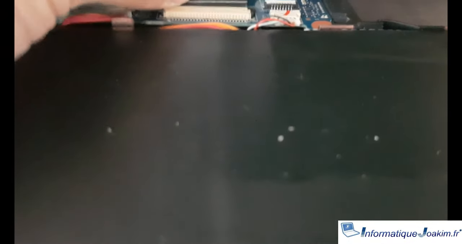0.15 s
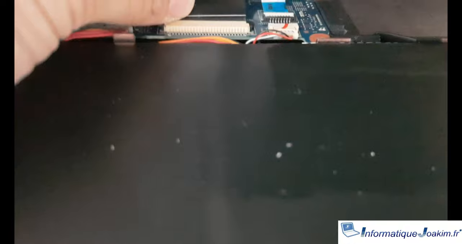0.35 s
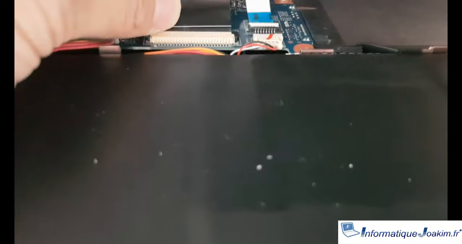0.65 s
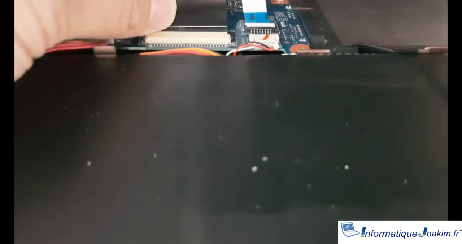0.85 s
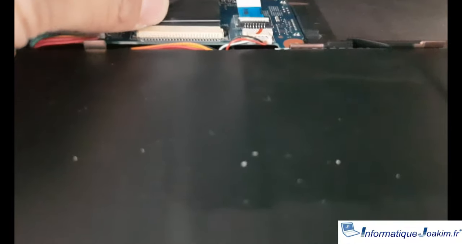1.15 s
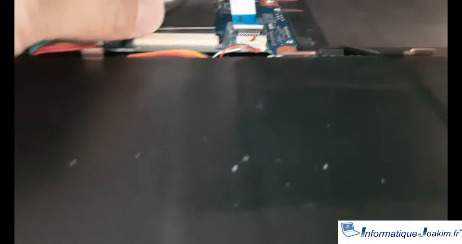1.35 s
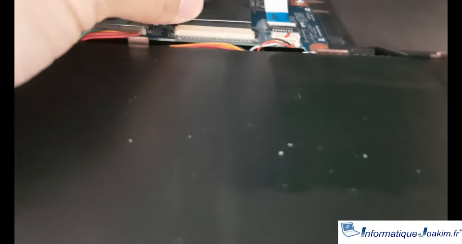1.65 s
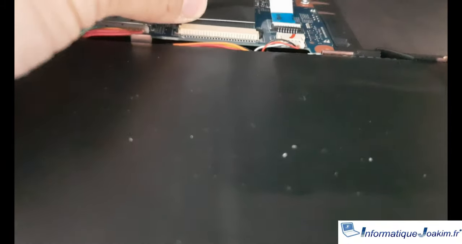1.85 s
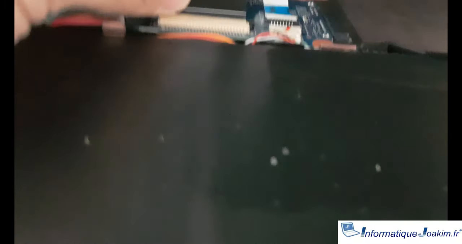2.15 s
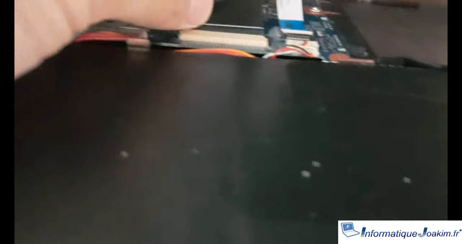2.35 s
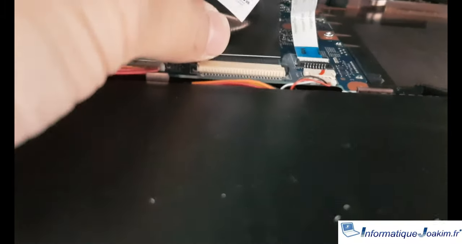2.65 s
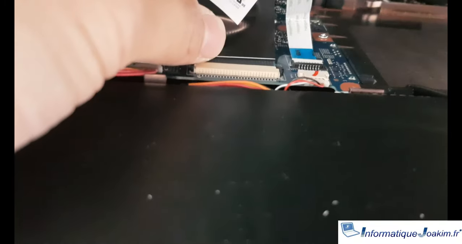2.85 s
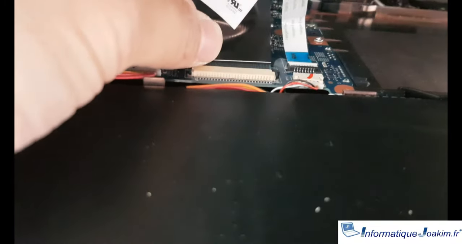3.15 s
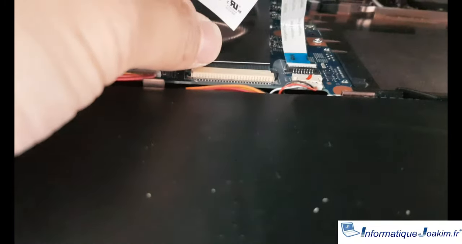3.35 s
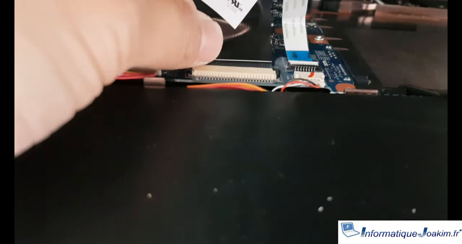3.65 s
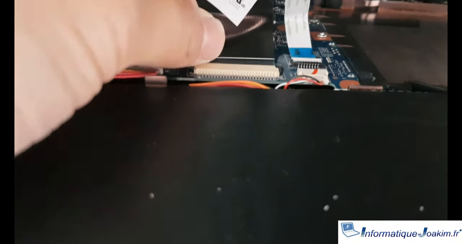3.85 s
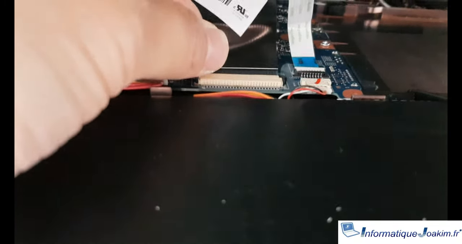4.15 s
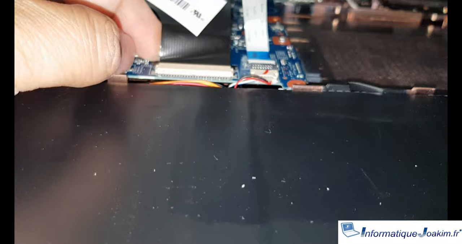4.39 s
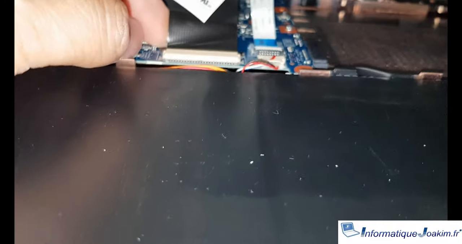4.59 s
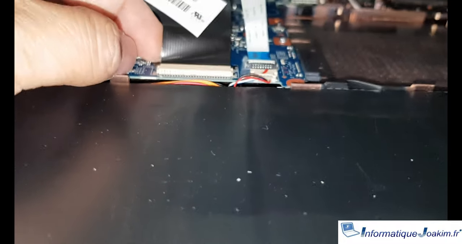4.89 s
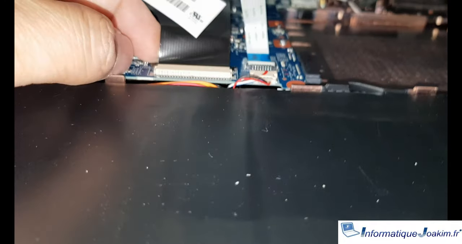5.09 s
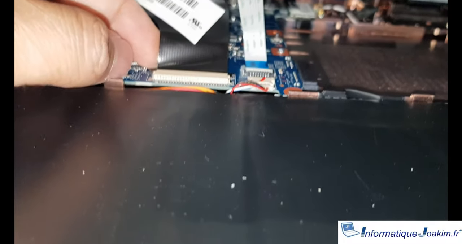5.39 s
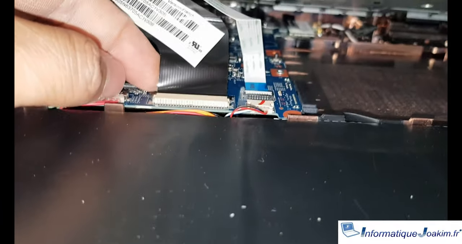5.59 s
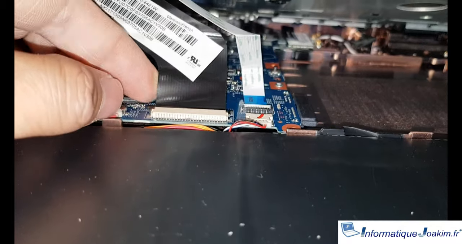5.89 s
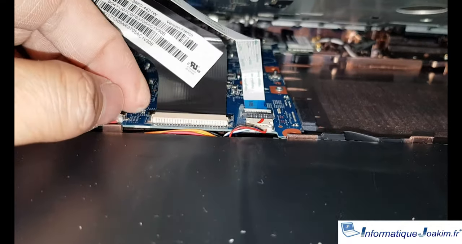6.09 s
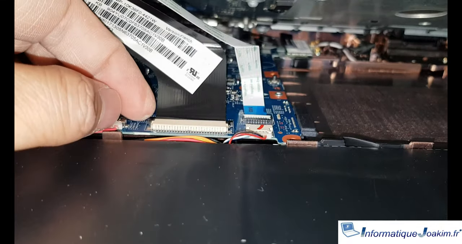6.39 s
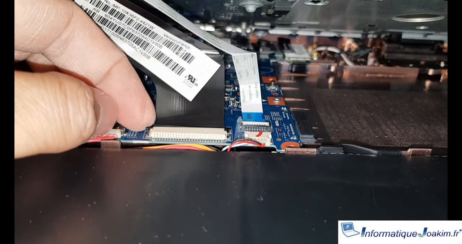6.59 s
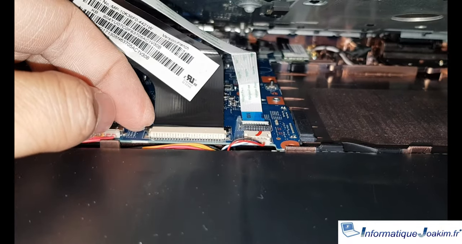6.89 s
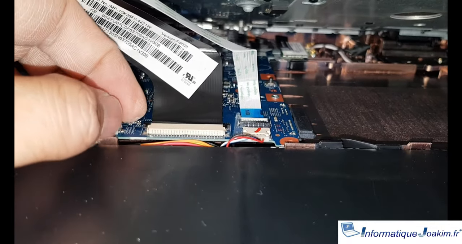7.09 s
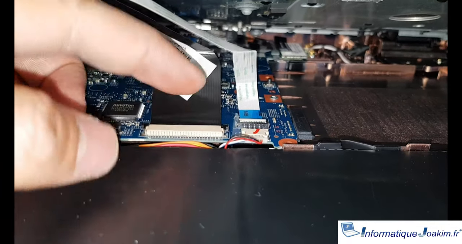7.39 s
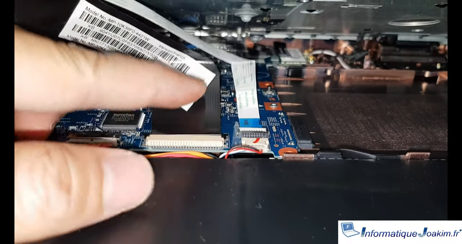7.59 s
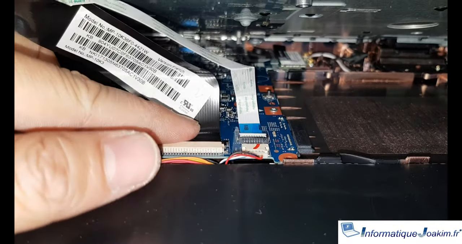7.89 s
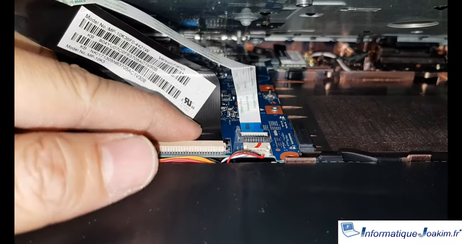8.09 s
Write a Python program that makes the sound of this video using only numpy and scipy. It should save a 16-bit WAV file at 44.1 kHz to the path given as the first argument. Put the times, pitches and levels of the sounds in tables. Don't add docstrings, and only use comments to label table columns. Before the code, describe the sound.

Soft film crackles and skin rustles, then heavy muffled bumps and hard clicks against a held microphone, quiet ventilation humming behind.

```python
import sys
import numpy as np
from scipy import signal
from scipy.fft import rfft, irfft
from scipy.io import wavfile

SR = 44100
rng = np.random.default_rng(int(sys.argv[2]) if len(sys.argv) > 2 else 0)


def gain_from_decibels(decibels):
    exponent = np.asarray(decibels, float) / 20
    return 10 ** exponent


def waveform_to_disk(signal):
    frames = np.transpose(np.atleast_2d(signal))
    scaled = np.clip(frames, -1, 1) * 32767
    samples = np.round(scaled).astype(np.int16)
    wavfile.write(sys.argv[1], SR, samples)


N = 363384
SILENCE_START_S, SILENCE_END_S = 4.326, 4.384


def noise(*channels):
    return rng.standard_normal((*channels, N))


def rms_one(x):
    return x / np.sqrt(np.mean(x ** 2) + 1e-20)


def in_time(curve, outside=None):
    s, db = np.transpose(curve)
    return np.interp(np.arange(N) / SR, s, db, outside, outside)


def at_hz(points, hz):
    point_hz, value = np.transpose(points)
    return np.interp(np.log(hz), np.log(point_hz), value)


def bins():
    return np.maximum(np.arange(N // 2 + 1) * SR / N, 1)


def peak(hz, width_hz):
    return 1 / (1 + (2 * (bins() - hz) / width_hz) ** 2)


def shaped(x, gain):
    return rms_one(irfft(rfft(x) * gain, N))


def closed(points):
    below = (points[0][0] / 2, -60)
    above = (points[-1][0] * 1.06, -70)
    return gain_from_decibels(at_hz([below] + list(points) + [above], bins()))


def panned(x, pan_db):
    centre_db = 20 * np.log10(np.cosh(pan_db * np.log(10) / 40))
    gains = gain_from_decibels(np.array([pan_db / 2, -pan_db / 2]) - centre_db)
    return x * gains[:, None]


def side(curve, s):
    return np.interp(s, *np.transpose(curve))


def add(out, s, burst):
    i = int(s * SR)
    out[:, i:i + burst.shape[1]] += burst[:, :N - i]


# (time [s], level [dB])
HUM_LEVEL = [(0.0, -47.5), (4.45, -48), (4.86, -43), (5.03, -49), (6.22, -50.5), (8.24, -48)]
# (frequency [Hz], density [dB per Hz])
HUM_SPECTRUM = [(18, -58), (30, -18), (58, -34.5), (91, -5), (131, -5), (156, -7), (202, -3.5), (239, -4),
                (309, -1), (344, -10.5), (426, -7), (601, -14.5), (922, -15), (2260, -27), (5000, -75.5),
                (6500, -99), (11000, -120)]
# (frequency [Hz], width [Hz], level over the hum [dB])
ROOM_MODES = [(101.3, 2.5, 8), (126.8, 19.4, 7), (213, 4.8, 10.5), (308, 4.2, 6), (303, 4, 3.5),
              (432.2, 1.6, 6.5), (495, 6.1, 4.5), (802, 17, 6.5), (912.6, 21, 7.5), (1065, 46, 0),
              (1468, 3.1, 14)]
# (frequency [Hz], correlation [-1 to 1])
LIKENESS = [(60, 0.75), (150, 0.98), (380, 0.84), (950, 0.14), (2380, -0.29), (5980, -0.021),
            (15000, -0.01)]


def hum():
    lift = 1 + sum(peak(hz, width) * gain_from_decibels(2 * db) for hz, width, db in ROOM_MODES)
    alike = np.clip(at_hz(LIKENESS, bins()), -.95, .95)
    mid, side_part = rfft(noise(2)) * closed(HUM_SPECTRUM) * np.sqrt(lift)
    ports = np.sqrt(1 + alike) * mid + np.sqrt(1 - alike) * side_part * [[1], [-1]]
    return gain_from_decibels(in_time(HUM_LEVEL) + 3.0) * rms_one(irfft(ports, N))


# (frequency [Hz], density [dB per Hz])
SELF_NOISE = [(1500, -12), (3000, -5), (5500, -6.5), (7300, -13), (9000, -11), (11000, -4.5), (13000, 0),
              (15500, -2.5)]


def self_noise():
    return gain_from_decibels(-77) * shaped(noise(2), closed(SELF_NOISE))


# (frequency [Hz], width [Hz], level before the silence [dB rms], level after it [dB rms])
RIGHT_BANDS = [(2100, 1050, -73, -60), (3010, 550, -75.5, -104), (4300, 2000, -77, -100.5),
               (5560, 960, -89.5, -78.5), (6390, 720, -83.5, -85)]
# (time [s], level [dB])
RIGHT_SHADE = [(0, 6.5), (.8, 0), (1.8, 4.5), (2.05, 6), (2.5, 6), (4.33, -4)]


def right_port_bands():
    out = np.zeros(N)
    before = np.arange(N) / SR < SILENCE_START_S
    shade_db = in_time(RIGHT_SHADE)
    for hz, width, before_db, after_db in RIGHT_BANDS:
        db = np.where(before, before_db + shade_db, after_db)
        wander_db = 2.2 * shaped(noise(), peak(0, 6.6))
        out += gain_from_decibels(db + wander_db) * shaped(noise(), peak(hz, width))
    return out


# (time [s], level [dB])
FINGERTIP = [(4.38, -56.5), (4.555, -56.5), (4.559, -82), (4.572, -79), (4.575, -37), (4.7, -57),
             (5.05, -51.5), (5.4, -51), (6.0, -50.5), (6.635, -50), (6.645, -100)]
# (frequency [Hz], density [dB per Hz])
FINGERTIP_COLOUR = [(700, 4.5), (1800, -2), (2300, 0), (3000, 8), (3800, 0.5), (5700, 1.5), (6600, -3.5),
                    (8000, -10.5), (9100, -7.5), (10000, -11), (10850, -9), (11500, -9), (11800, -25),
                    (13000, -28), (15000, -40)]


def fingertip():
    return gain_from_decibels(in_time(FINGERTIP, -150)) * shaped(noise(), closed(FINGERTIP_COLOUR))


# (time [s], level [dB rms])
LEFT_LINE = [(4.385, -77), (5.2, -129), (6.4, -100), (6.7, -100)]


def left_line():
    return gain_from_decibels(in_time(LEFT_LINE, -150)) * shaped(noise(), peak(10680, 350))


def whistle():
    t = np.arange(N) / SR
    sounding = (t > 2.12) & (t < 2.62)
    return gain_from_decibels(-83) * np.sin(2 * np.pi * 14406 * t) * sounding


def capsules():
    left = left_line()
    right = right_port_bands() + fingertip() + whistle()
    return self_noise() + np.array([left, right])


# (time [s], level [dB])
SWAY = [(0.0, -65.5), (3.19, -55), (3.35, -73), (4.18, -66), (4.8, -47), (5.21, -69), (5.51, -55),
        (6.72, -65), (7.16, -54), (8.24, -70.5)]


def sway():
    shared, left, right = noise(3)
    ports = np.array([1.7 * shared + left, 1.6 * shared + right])
    rumble = shaped(ports, peak(69, 67) * np.minimum(bins() / 40, 1) ** 2)
    return gain_from_decibels(in_time(SWAY) + 6.0) * rumble


# (time [s], pan [dB])
GRIP_SIDE = [(1.0, 4.5), (2.1, 2), (2.5, 7), (3.3, 1.5), (4.4, -3.5), (4.81, 0.5), (4.88, -13.5),
             (5.04, -11), (5.3, -43), (5.5, -24), (7.0, -10), (7.36, -4)]
# (time [s], peak level [dB], frequency [Hz])
LURCHES = [(1, -43, 71.6), (1.248, -34, 74.5), (1.33, -36, 74), (1.607, -40, 90), (2.05, -34.5, 63),
           (2.399, -55, 92), (2.661, -47, 94), (2.83, -39, 91.5), (3.242, -32, 92.5), (4.405, -42, 65),
           (4.573, -33, 56), (4.59, -42, 108), (4.8, -59, 92), (5.041, -33, 78.6), (5.297, -36.5, 81.6),
           (5.498, -60, 86.1), (7.099, -63, 95), (7.299, -59, 84)]


def lurches(rise_s):
    out, t = np.zeros((2, N)), np.arange(SR // 6) / SR
    port_lag = np.array([[0], [.8]])
    for s, db, hz in LURCHES:
        swell = t / rise_s * np.exp(1 - t / rise_s)
        wave = np.sin(2 * np.pi * hz * t - port_lag) * swell
        add(out, s, gain_from_decibels(db) * panned(wave, side(GRIP_SIDE, s)))
    return out


def gliding_cycles(t, hz, glide, glide_s):
    return hz * (t + glide * glide_s * (1 - np.exp(-t / glide_s)))


# (time [s], peak level [dB], final frequency [Hz], decay [s])
KNOCKS = [(2.2, -31.5, 477, .006), (2.2914, -35, 382, 0.009), (2.4122, -39, 450, 0.00067),
          (2.4698, -26, 477, 0.005), (2.531, -26, 400, 0.0052), (2.5987, -25, 377, 0.0028),
          (2.8051, -26.5, 386, 0.0059), (4.4738, -32, 443, 0.0049), (4.494, -30.5, 436, 0.0049),
          (4.5163, -33.5, 433, 0.013), (4.544, -27.5, 440, 0.0081)]


def knocks(glide, glide_s, right_db):
    out, t = np.zeros((2, N)), np.arange(SR // 30) / SR
    port_gain = gain_from_decibels(np.array([[0], [right_db]]))
    for s, db, hz, decay_s in KNOCKS:
        cycles = gliding_cycles(t, hz, glide, glide_s)
        envelope = np.exp(-(t / decay_s) ** 2) * (1 - np.exp(-t / 0.00034))
        add(out, s, gain_from_decibels(db + 4.5) * np.sin(2 * np.pi * cycles) * envelope * port_gain)
    return out


# (time [s], peak level [dB], frequency [Hz], ring T60 [s], left shell ring against the peak [dB])
THUMPS = [(1.248, -37, 209, 0.012, -9), (1.308, -40, 135, 0.1, -20), (1.619, -41, 113, 0.035, -24),
          (2.082, -43.5, 146, 0.069, -20), (2.4107, -27.5, 133, 0.022, -23),
          (2.5435, -30.5, 109, 0.031, -28), (2.6754, -14.5, 135, 0.017, -12.5),
          (2.833, -15.5, 159, 0.015, -12), (2.9318, -22, 176, 0.018, -8.5), (3.0197, -21, 168, 0.018, -7),
          (3.1082, -19.5, 173, 0.017, -5), (3.1632, -17.5, 148, 0.011, -8.5),
          (3.2365, -20.5, 133, 0.013, -10), (4.575, -21.5, 163, 0.019, -7),
          (4.6867, -27.5, 200, 0.01, -8.5), (4.702, -30.5, 219, 0.017, -9), (4.7193, -25, 240, 0.014, -11),
          (5.735, -24.5, 266, .015, -30), (4.7447, -9.5, 149, 0.032, -3), (4.8045, -8.5, 153, 0.028, -6),
          (4.8787, -10, 150.5, 0.029, 2.5), (4.8943, -30, 170, .02, -15), (4.921, -29, 160, 0.024, -6),
          (4.9633, -24, 199, 0.013, -10), (4.979, -23, 240, 0.015, -8), (4.994, -10.5, 150, 0.024, -1),
          (5.04, -35, 126, 0.044, 1), (5.296, -22.5, 132, 0.0082, -30), (5.513, -15, 196, 0.0097, -30),
          (6.992, -35.5, 207, 0.024, -20), (7.017, -39.5, 208, 0.035, -20), (7.12, -33.5, 213, 0.02, -20),
          (7.168, -35, 194, 0.031, -20), (7.22, -28.5, 181, 0.019, -27), (7.282, -31, 175, 0.019, -20),
          (7.36, -27.5, 131, 0.017, -17)]
FRAME_HZ, FRAME_S, FRAME_DB = 358, 0.0063, -13
SHELL_HZ, SHELL_S = 670, .003
PRESS_S = .0014
LEFT_LATE_S = 0.0008


def thumps(glide, glide_s, puff_db, puff_s):
    out, t = np.zeros((2, N)), np.arange(SR // 12) / SR
    far_filter = signal.butter(1, 330, fs=SR)
    skin_filter = signal.butter(1, [700, 7000], "band", fs=SR)
    puff_fade = np.exp(-(t / puff_s) ** 3)
    frame_swell = t / FRAME_S * np.exp(1 - t / FRAME_S) * np.exp(-t / 0.005)
    frame = gain_from_decibels(FRAME_DB) * np.cos(2 * np.pi * FRAME_HZ * t) * frame_swell
    shell = np.sin(2 * np.pi * SHELL_HZ * t) * np.exp(-t / SHELL_S) * (1 - np.exp(-4 * t / PRESS_S))
    for s, db, hz, t60, shell_db in THUMPS:
        cycles = gliding_cycles(t, hz, glide, glide_s)
        damping = gain_from_decibels(-60 * (t / max(t60, .01)) ** 1.5)
        near = -np.sin(2 * np.pi * cycles) * damping * (1 - np.exp(-t / PRESS_S)) + frame
        far = 0.8 * signal.lfilter(*far_filter, near)
        wave = np.array([near - gain_from_decibels(shell_db) * shell, far])
        if s > SILENCE_END_S:
            wave[0] = np.interp(t - LEFT_LATE_S, t, wave[0], 0)
        puff = signal.lfilter(*skin_filter, rng.standard_normal((2, len(t)))) * puff_fade * gain_from_decibels(puff_db)
        add(out, s + .0008, gain_from_decibels(db + 8.0) * panned(wave + puff, side(GRIP_SIDE, s)))
    return out


def contacts(table, ring_cycles, rise_s, snap_s, rough, tail_db, spike, top_pan_db):
    out, t = np.zeros((2, N)), np.arange(SR // 20) / SR
    snap_filter, top_filter = [signal.butter(4, edges, "band", fs=SR, output="sos")
                               for edges in ([3700, 6500], [9000, 14300])]
    fall = np.exp(-t / snap_s) + gain_from_decibels(tail_db) * np.exp(-t / .008)
    decay = (1 - np.exp(-(t / rise_s) ** 2)) * fall
    detune, lag = np.array([[.96], [1.05]]), np.array([[1.2], [0]])
    for s, db, hz, pan_db, snap_db, top_db in table:
        shared, left, right = rng.standard_normal((3, len(t))) * decay
        splinters = np.array([left + .5 * shared, right + .5 * shared])
        splinters[:, int(2 * rise_s * SR)] -= spike
        body_filter = signal.butter(3, [hz / 4, 1.9 * hz], "band", fs=SR, output="sos")
        layers = [signal.sosfilt(f, splinters) for f in (body_filter, snap_filter, top_filter)]
        body, snap, top = [x / np.abs(x).max(axis=1, keepdims=True) for x in layers]
        ring = np.sin(2 * np.pi * hz * detune * t - lag) * np.exp(-t * hz / ring_cycles)
        ring *= 1 - np.exp(-(3 * hz * t) ** 2)
        burst = gain_from_decibels(db + 3) * (ring + rough * body)
        burst += gain_from_decibels(snap_db + 6) * snap + gain_from_decibels(top_db + 6) * panned(top, top_pan_db)
        add(out, s, panned(burst, pan_db))
    return out


# (time [s], peak level [dB], ring [Hz], pan [dB], edge above 8 kHz [dB])
CLICKS = [
    (2.803, -17, 1720, 9.5, -36.5),
    (4.746, -26, 935, -8, -42),
    (4.806, -27, 890, 3, -41),
    (4.88, -23.5, 1320, -4, -44),
    (4.996, -24, 1100, -7.5, -49),
    (6.411, -60, 790, -5, -52),
    (7.994, -50, 763, 13, -57),
]
TICKS = [(2.199, -39.5, 1190, 23, -72), (2.289, -43.5, 1010, 13, -72), (2.412, -31.5, 900, 16, -78),
         (2.47, -37.5, 1100, 0, -80), (2.531, -39.5, 1510, -9, -70), (4.474, -33.5, 910, 10, -50),
         (4.495, -29.5, 1100, -6, -35.5), (4.515, -27, 880, -3, -34.5), (4.544, -32.5, 1200, -6, -35),
         (4.687, -41, 750, 20, -61), (4.703, -52, 1270, 17, -54), (4.893, -27.5, 1310, -8, -32),
         (4.922, -32.5, 600, -23, -36.5), (4.963, -30, 600, -14, -37), (5.0385, -27.5, 490, 1, -46),
         (5.042, -31.5, 1400, -18, -33.5), (5.0445, -27.5, 910, -3, -40), (5.787, -57, 1090, 1, -54),
         (5.515, -33, 534, -19, -70), (5.297, -23, 1560, -27, -40), (5.513, -22, 1600, -28.5, -36),
         (5.735, -24, 2260, -37, -43.5)]
CRACKS = [
    (2.598, -43, 905, 6, -72),
    (4.573, -22.5, 1400, -1, -34.5),
    (4.72, -31, 1100, 12, -66),
    (6.637, -37, 790, -40, -60),
]


def grip_ticks():
    kinds = (CLICKS, -44), (TICKS, -0.5), (CRACKS, 17.5)
    grip = [(s, db, hz, pan_db, edge_db + snap_db, edge_db)
            for rows, snap_db in kinds for s, db, hz, pan_db, edge_db in rows]
    return contacts(grip, ring_cycles=1.8, rise_s=.0006, snap_s=.001, rough=1.1,
                    tail_db=-40, spike=3.5, top_pan_db=-13)


# (start [s], end [s], start frequency [Hz], end frequency [Hz], level [dB rms])
SQUEAKS = [
    (6.984, 7.04, 3480, 3370, -60),
    (7.105, 7.16, 3540, 2820, -52),
]


def squeaks(width_hz):
    out = np.zeros((2, N))
    blur = shaped(noise(2), peak(0, width_hz))
    for start, end, hz0, hz1, db in SQUEAKS:
        n, i = int((end - start) * SR), int(start * SR)
        tone = np.sin(2 * np.pi * np.cumsum(np.linspace(hz0, hz1, n)) / SR)
        tone *= signal.windows.tukey(n, .3) * np.linspace(.45, 1, n)
        add(out, start, gain_from_decibels(db + 9.5) * tone * blur[:, i:i + n])
    return out


# (time [s], pan [dB])
CABLE_SIDE = [(0.85, 3), (1.05, 3), (1.3, -3), (2.3, -6.5), (2.55, 9), (2.8, -4.5), (4.7, 1.5), (4.95, -9),
              (5.9, 0.5), (8.2, -2)]
# (start [s], length [s], level [dB], brightness [dB], scratchiness [dB])
STROKES = [(0.845, 0.11, -67.5, -9, 1), (0.962, 0.11, -77, -18.5, 10), (1.05, 0.062, -78, -9.5, 3),
           (1.23, 0.12, -77, -11, -1), (1.503, 0.071, -81.5, 0, 2), (1.565, 0.084, -72, -11.5, -8),
           (2.538, 0.05, -65.5, -5, -2), (2.562, 0.07, -75, -5, 3), (2.794, 0.019, -61, -13, -3),
           (4.497, 0.068, -69.5, -8, 6), (4.571, 0.018, -56, 10, 10), (4.578, 0.086, -58, -4, 10.5),
           (4.676, 0.15, -57, -2, 0.5), (4.878, 0.026, -57.5, -11, 7), (4.919, 0.01, -54.5, -11, -3),
           (4.956, 0.064, -56.5, -5.5, -4), (5.034, 0.018, -53, -3, -1.5), (4.912, 0.17, -97.5, -13, -9),
           (5.911, 0.052, -68.5, -1.5, 10), (6.977, 0.89, -76, -6, -4.5), (6.991, 0.059, -71.5, -4.5, -21),
           (7.096, 0.14, -70.5, -2, 0.5), (7.416, 0.054, -69, -5, -3), (7.496, 0.094, -82.5, 8, 8),
           (8.2, 0.06, -72.5, -4, -2)]
# (start [s], length [s], level [dB], brightness [dB], scratchiness [dB])
SWEEPS = [
    (1.33, 0.067, -63, -4.5, -6),
    (1.9, 0.33, -77, 2, 10.5),
    (2.202, 0.17, -82.5, 9.5, 10),
    (7.15, 0.23, -67, 9, 6.5),
    (7.61, 0.11, -71.5, 10, 2),
    (8.133, 0.081, -60.5, 0.5, -5),
]
# (frequency [Hz], density [dB per Hz])
RUB = [
    [(900, 10.5), (1500, 8.5), (2100, 9), (3000, 0.5), (4500, -54)],
    [(2400, -14.5), (3300, -15.5), (5000, -13), (6800, -23), (9000, -66)],
    [(6500, -12.5), (8800, -3), (11500, -0.5), (13500, -2), (15500, -9)],
]


def rubbing(grains_per_s, spread_db, clump_db):
    clumps = gain_from_decibels(clump_db * shaped(noise(), peak(0, 130)))
    born = rng.random((2, N)) < grains_per_s / SR
    sizes = gain_from_decibels(spread_db * np.minimum(rng.exponential(1, (2, N)), 4))
    grains = born * sizes * rng.choice([-1, 1], (2, N)) * clumps
    colours = []
    for colour in RUB:
        patch = gain_from_decibels(1.6 * shaped(noise(), peak(0, 30)))
        colours.append(patch * shaped(grains, closed(colour)))
    moves = [(*row, .05, .2) for row in STROKES] + [(*row, 0.83, 0.6) for row in SWEEPS]
    out = np.zeros((2, N))
    for s, length, level_db, bright_db, scratch_db, land, lift in moves:
        a, b = int(s * SR), min(int((s + length) * SR), N)
        levels_db = level_db - bright_db, level_db + scratch_db, level_db + bright_db
        rub = sum(gain_from_decibels(db + 7.5) * colour[:, a:b] for db, colour in zip(levels_db, colours))
        phase = np.linspace(0, 1, b - a)
        touch = np.minimum(phase / land, 1) * np.minimum((1 - phase) / lift, 1)
        out[:, a:b] += touch * panned(rub, side(CABLE_SIDE, s))
    return out


# (time [s], peak level [dB], ring [Hz], edge above 8 kHz [dB])
CRACKLES = [(.1394, -45, 920, -78), (0.321, -48, 840, -69), (0.851, -40.5, 3080, -62),
            (.8555, -52, 2520, -58), (0.8746, -31.5, 2320, -59), (0.8914, -34, 2080, -42.5),
            (0.9007, -38, 2100, -57), (0.912, -36, 2580, -53), (0.9267, -41, 2440, -60),
            (0.972, -42, 2100, -49), (0.984, -40, 2060, -59), (0.9913, -36, 2150, -51),
            (1.006, -32.5, 2050, -54), (1.0116, -47, 2050, -45), (1.0315, -36, 2190, -56),
            (1.037, -43, 2100, -64), (1.0454, -51, 1980, -55), (1.058, -46, 2070, -64),
            (1.2426, -39.5, 650, -84), (1.2984, -41, 690, -89), (1.3045, -30.5, 688, -84),
            (1.3105, -38, 690, -88), (1.368, -55, 2280, -54), (1.57, -48, 2370, -82),
            (1.57, -38.5, 660, -85), (1.5977, -58, 2170, -87), (1.6224, -44, 640, -91),
            (2.0637, -39, 2010, -58), (2.0783, -43.5, 910, -49), (2.1206, -49, 1000, -51),
            (4.4142, -43, 1350, -68), (5.9343, -44, 706, -48), (7.456, -41, 1340, -70)]


def cable_crackles():
    cable = []
    for s, db, hz, edge_db in CRACKLES:
        snap_db = max(edge_db - 1.5, db - 21)
        cable.append((s, db, hz, side(CABLE_SIDE, s), snap_db, edge_db))
    return contacts(cable, ring_cycles=6, rise_s=.0007, snap_s=.0015, rough=1.0,
                    tail_db=-24, spike=.7, top_pan_db=-5)


def scene():
    hand = sway() + lurches(rise_s=0.01) + knocks(glide=1.3, glide_s=.0028, right_db=-22)
    hand += thumps(glide=2.6, glide_s=.001, puff_db=-35.5, puff_s=0.014)
    hand = signal.sosfilt(signal.butter(2, 42, "high", fs=SR, output="sos"), hand)
    cable = squeaks(width_hz=500) + rubbing(grains_per_s=6000, spread_db=3.2, clump_db=2.0) + cable_crackles()
    return hum() + capsules() + hand + grip_ticks() + cable


def low_pass(x):
    return signal.sosfilt(signal.butter(12, 16600, fs=SR, output="sos"), x)


def record(dry):
    t = np.arange(N) / SR
    silent = (t > SILENCE_START_S) & (t < SILENCE_END_S)
    cut = signal.sosfilt(signal.butter(6, 15700, fs=SR, output="sos"), dry)
    rounded = 0.5 * np.tanh(cut / 0.61)
    finished = rounded * np.where(silent, gain_from_decibels(-51), 1)
    return low_pass(finished)


dry = scene()
out = record(dry)
waveform_to_disk(out)
```